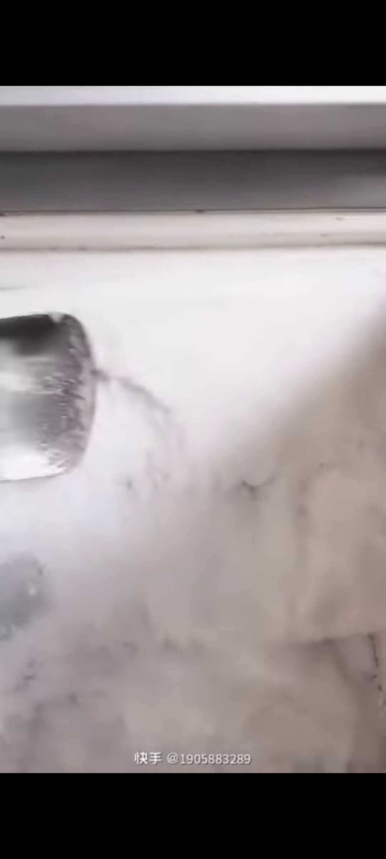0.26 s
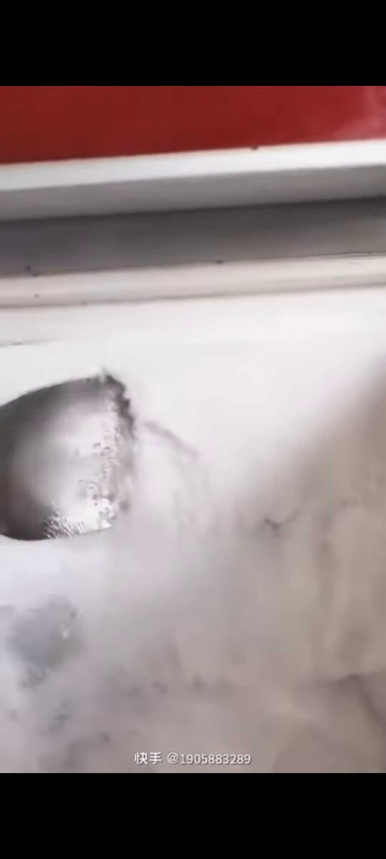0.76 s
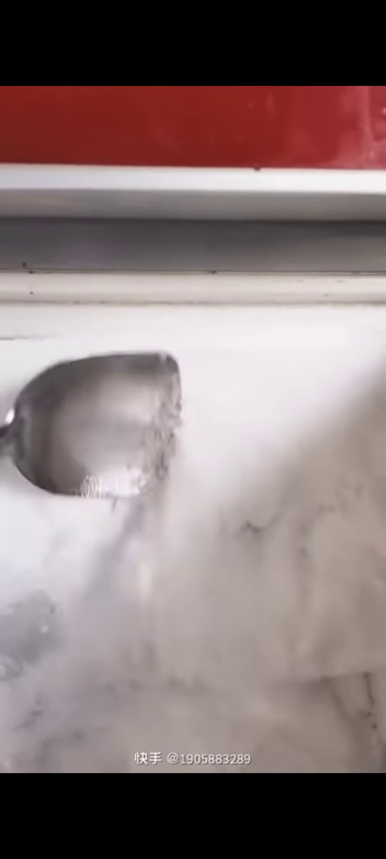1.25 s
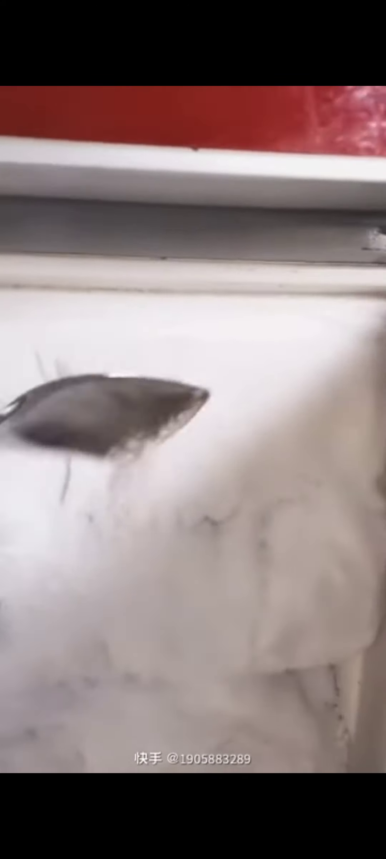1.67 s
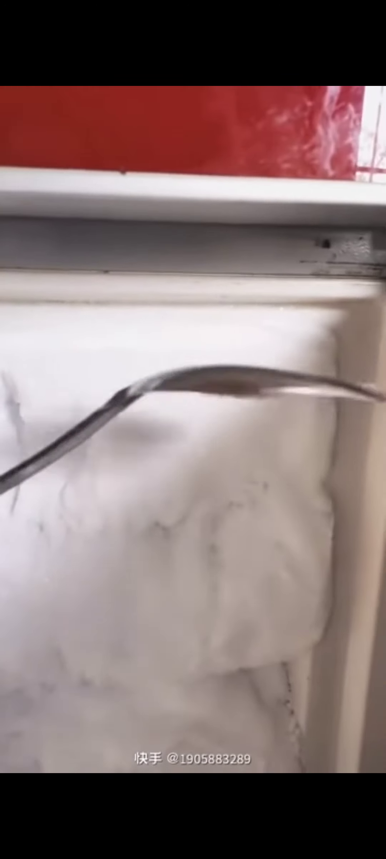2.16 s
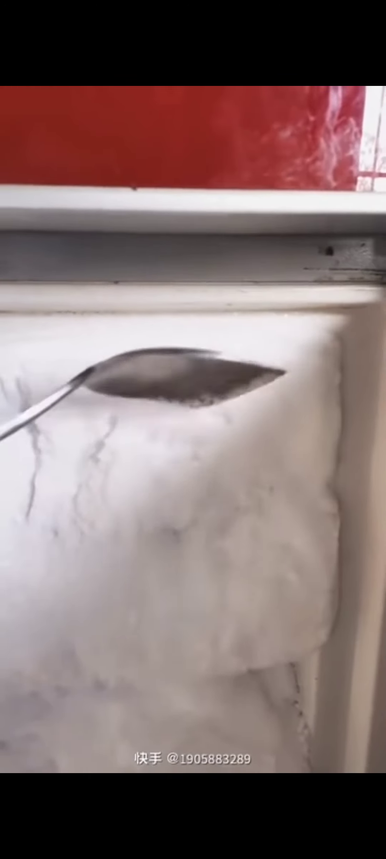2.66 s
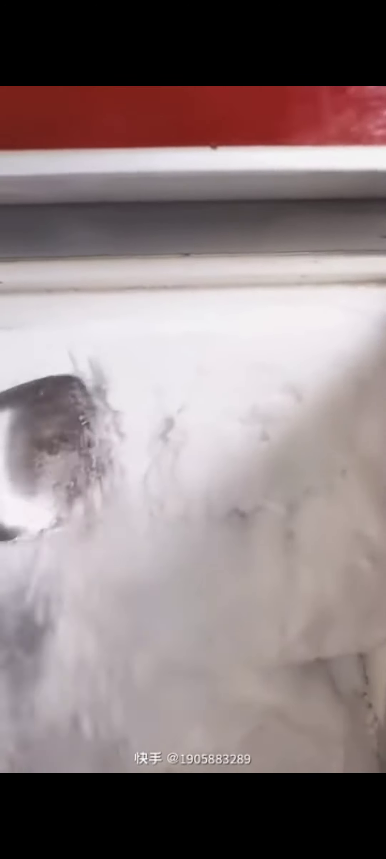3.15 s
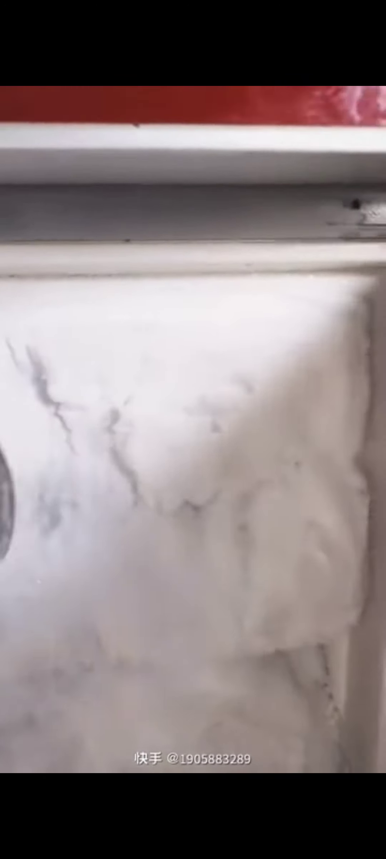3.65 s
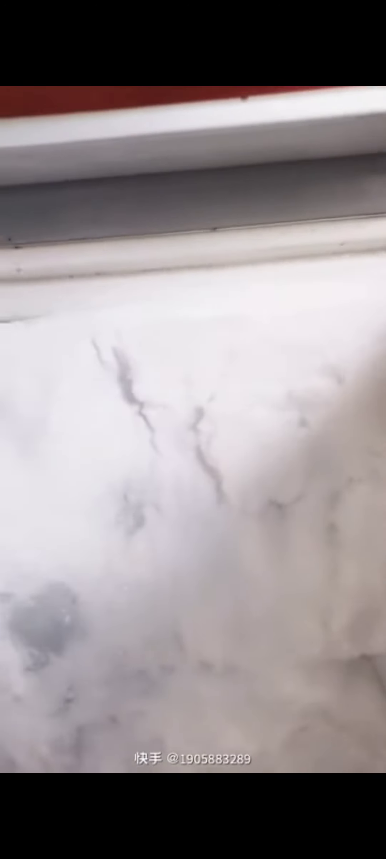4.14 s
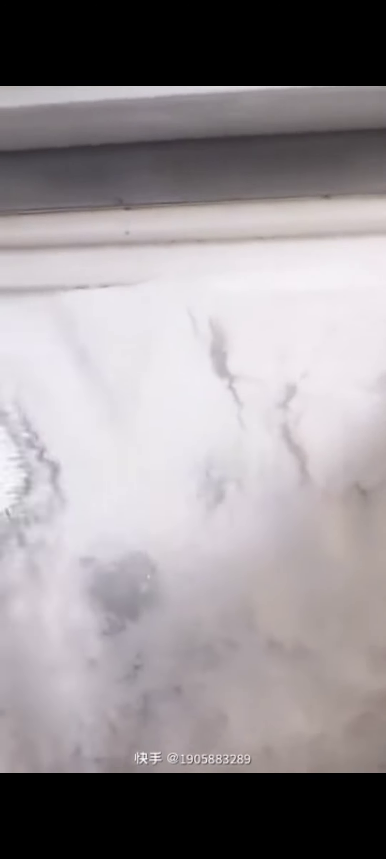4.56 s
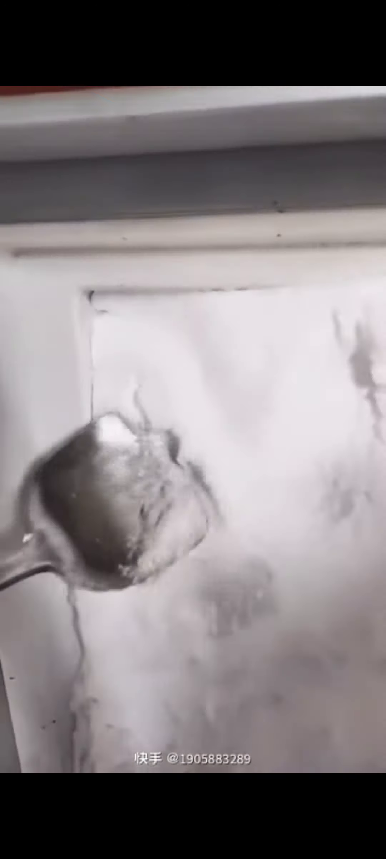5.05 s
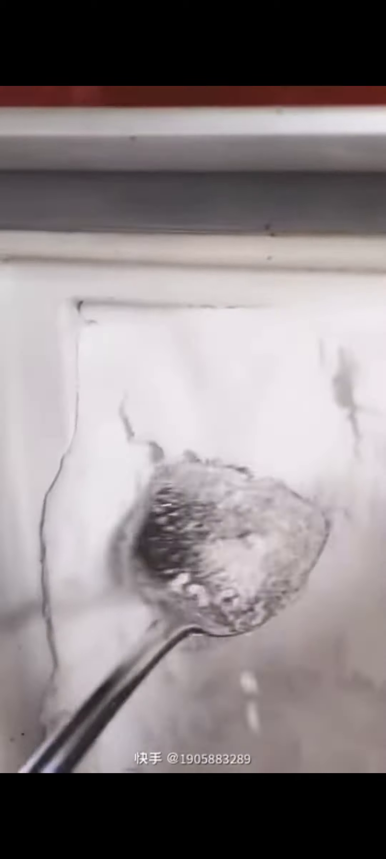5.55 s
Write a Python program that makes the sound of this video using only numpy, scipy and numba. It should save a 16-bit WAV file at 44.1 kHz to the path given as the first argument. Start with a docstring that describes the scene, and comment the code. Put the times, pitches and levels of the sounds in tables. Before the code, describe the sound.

Brittle ice crystals crackle under a metal spoon edge in uneven bursts, each a rough rasp or sharp chop. The spoon clinks and sings briefly while the hollow freezer wall thuds beneath. After a sparser middle, the strokes crowd together loudly, then continue as frequent crisp scrapes with less bass. Recorded close in a small compartment opening onto a quiet kitchen, the loudest blows flattened.

```python
"""A steel spoon scrapes and chops thick frost in an open freezer in a kitchen, close to the microphone.
It starts on the right of the wall, with strokes and jabs; ice crystals snap in stick-slip clusters under
the edge, ring the spoon and drum the hollow plastic liner. At 3.53 s it moves to the left part of the wall,
where the liner gives less bass. The compartment and then the kitchen echo each stroke over faint still air;
the loudest peaks overload the microphone."""
import sys
import numpy as np
from scipy import signal
from scipy.fft import rfft, irfft
from scipy.io import wavfile
from scipy.ndimage import uniform_filter1d
from numba import njit

SR = 44100
rng = np.random.default_rng(int(sys.argv[2]) if len(sys.argv) > 2 else 0)


def transcribe(u):
    """Save the signal u as a 16-bit wav file named by the first command-line argument.

    u: samples, shape (n,) or (channels, n), limited to [-1, 1]; the rate is SR.
    q: integer samples, one column per channel.
    """
    v = np.clip(np.atleast_2d(u).T, -1, 1)
    q = np.round(v * 32767).astype(np.int16)
    wavfile.write(sys.argv[1], SR, q)


N = 256112
TIME = np.arange(N) / SR
# the spoon moves to the left part of the wall (s)
SHIFT_S = 3.53


def scraping():
    """Clusters of snapping crystals crunch, shed flakes, make the pressed spoon sing and drum the liner."""
    pressure, hiss_db, drum_db, sing_db = stroke_controls()
    slips = stick_slip(rate=320, scatter_db=2.5, slip_s=0.0045, drag=0.66)
    # harder and softer lumps pass under the edge
    pressure = pressure * undb(1.9 * wander(55))
    snaps = pressure * slips * crystals(N, rate=14000, spread_db=3.5)
    # the edge bears on ever new lumps, so the pitch of the contact keeps hopping
    lump_hz = contact_pitch(TIME) * np.exp(0.2 * np.clip(wander(70), -2, 2))
    force = contact(snaps, hiss_db, lump_hz, width=0.1, bite_db=7.0)
    flakes = pressure * chips(rate=260, low_hz=758, high_hz=6310, cycles=3.7, scatter_db=1.5)
    # where the ice is hard and smooth the spoon sings and the crunch recedes
    crunch = undb(-7.5) * frost(force) + undb(-11.5) * flakes
    crunch = undb(-0.4 * sing_db) * crunch
    singing = undb(-7 + sing_db) * bowl(snaps)
    drumming = undb(-5) * liner(snaps * undb(drum_db), damping=1.3)
    return crunch + singing + drumming


def stroke_controls():
    """Each stroke digs in, pushes and eases off; where two overlap the firmer one leads, between them it lifts."""
    # scraping strokes; the last three columns are balances of fine-crystal hiss, liner and spoon,
    # before they shift with the pressure and the depth of the edge:
    # start_s, dig_in_s, full_push_s, easing_off_s, full_pressure_db, hiss_db, drumming_db, singing_db
    strokes = [ (0.01, 0.013, 0.1, 0.15, -25.5, -1, -4.5, 5),
               (0.146, 0.017, 0.011, 0.095, -6.5, 2.5, 0.5, 0), (0.31, 0.01, 0.017, .03, -32, 10.5, -2, 1),
               (0.361, 0.077, 0.017, 0.034, -12.5, 5, -4, 3), (0.49, 0.014, .1, 0.032, -30, 9, -6, -1),
               (0.629, 0.027, 0.019, 0.086, -9, 5.5, -8, 0.5), (0.867, 0.02, .012, .03, -12, 10, -10, 2),
               (0.905, 0.0072, 0.024, 0.079, -16, 8.5, -3, 4), (1.04, 0.013, .02, 0.12, -22, -1, -6, -5),
               (1.154, 0.0075, 0.0091, 0.039, -27, 13, 2.5, 5.5),
               (1.266, 0.0045, 0.089, 0.076, -21, -4.5, -11, -4.5), (1.99, .01, .05, 0.35, -31, 1, -7, 2),
               (2.354, 0.0051, 0.03, 0.12, -27, 2.5, -2.5, -2),
               (2.485, 0.0087, .01, 0.13, -34.5, 3, -8, -1),
               (2.596, 0.0056, .03, 0.025, -24.5, 6.5, 0, 2.5),
               (2.627, .045, 0.053, 0.013, -7, 0.5, -11, -0.5),
               (2.735, 0.027, .02, 0.034, -28, 0, -2.5, -3),
               (2.923, 0.022, .015, 0.028, -9.5, 2, -12.5, 6.5),
               (2.963, 0.013, 0.028, 0.076, -4.5, 1.5, -10, 1),
               (3.07, 0.05, 0.06, 0.064, -21.5, 4, -8.5, 4.5), (3.245, 0.011, 0.059, .03, -39, 11, -6, -1),
               (3.559, 0.0087, 0.016, .05, -32, 7, -8, 7.5),
               (3.642, 0.0073, 0.011, 0.084, -5, -0.5, -8.5, 3.5),
               (3.69, 0.014, 0.022, 0.11, -20, 6, -12, 6),
               (3.905, 0.05, 0.0069, 0.057, -5.5, 0.5, -13.5, 3),
               (4.03, 0.015, 0.011, 0.054, -20.5, 9, -7, 3),
               (4.163, 0.038, 0.017, 0.067, -10, 1.5, -8.5, 0.5),
               (4.26, 0.021, 0.034, 0.11, -28, 5.5, -9, 4), (4.446, 0.0071, 0.0084, 0.058, -7, 2, -9.5, 4),
               (4.53, 0.025, 0.0046, 0.059, -16.5, 5, -13, 3),
               (4.668, 0.0061, 0.018, .01, -17.5, 9, -10, 7),
               (4.68, 0.016, 0.1, 0.048, -13.5, 8.5, -6, 5.5), (4.95, 0.014, 0.048, 0.037, -31, 5, 1, 3),
               (5.028, 0.017, 0.02, 0.033, -19, 9, -10, 9), (5.078, 0.013, 0.03, 0.052, -8.5, 3, -7.5, 2),
               (5.185, 0.025, .005, 0.012, -15, 5, -14.5, 2.5), (5.27, .016, 0.034, 0.073, -14.5, 2, 1, 4),
               (5.42, .02, .005, 0.081, -16, 0, -6.5, 3.5), (5.55, .028, 0.0088, 0.036, -10, 3, -2, 3),
               (5.646, 0.023, 0.037, 0.027, -14.5, 8, -13, 7.5), ]
    # pressure at both ends, relative to the full push (dB)
    first_touch_db, last_touch_db = -20, -26.5
    # time for the edge to land and to lift (s)
    land_s, lift_s = 0.0034, 0.0058
    # the liner drums more as the edge sinks through the frost (dB)
    drum_start_db, drum_end_db = -4.5, 6.5
    # a light touch breaks only fine crystals and lets the spoon sing more freely (dB per dB of slack)
    hiss_per_slack, sing_per_slack = 0.1, 0.21
    controls = np.zeros((4, N))
    for start, dig_s, push_s, ease_s, db, hiss_db, drum_db, sing_db in strokes:
        corners = start + np.cumsum([0, dig_s, push_s, ease_s])
        end = corners[-1]
        contact_s = [start - land_s, start, end, end + lift_s]
        span = slice(*np.searchsorted(TIME, [contact_s[0], contact_s[-1]]))
        t = TIME[span]
        slack_db = -np.interp(t, corners, [first_touch_db, 0, 0, last_touch_db])
        touching = np.interp(t, contact_s, [0, 1, 1, 0])
        pressure = touching * undb(db - slack_db)
        sunk_db = np.interp(t, [start, end], [drum_start_db, drum_end_db])
        stroke = [
            pressure,
            hiss_db + hiss_per_slack * slack_db,
            drum_db + sunk_db,
            sing_db + sing_per_slack * slack_db,
        ]
        firmer = pressure > controls[0, span]
        controls[:, span] = np.where(firmer, stroke, controls[:, span])
    return controls


def stick_slip(rate, scatter_db, slip_s, drag):
    """The edge catches and lets go at uneven moments (rate per second), over a steady drag; rms near 1."""
    chance = rng.random((N, 2))
    slips = (chance[:, 0] < rate / SR) * undb(scatter_db * chance[:, 1])
    gate = through(slips, np.exp(-TIME[:SR // 10] / slip_s))
    gate = gate / gate.mean() + drag
    # the hand keeps the mean force even
    return gate / np.sqrt(uniform_filter1d(gate ** 2, size=1400))


def crystals(size, rate, spread_db):
    """Snaps of single ice crystals (rate per second): many small, a few large; rms 1."""
    strength = undb(spread_db * np.minimum(rng.exponential(size=size), 4))
    happens = rng.random(size) < rate / SR
    snaps = happens * rng.choice([-1, 1], size) * strength
    return snaps / np.sqrt(np.mean(snaps ** 2))


def contact_pitch(t):
    """Resonance of the edge against the ice at these times, in Hz, as the spoon works over the wall."""
    # path of the contact resonance: time_s, pitch_hz
    path = [(0, 1454), (0.42, 1240), (0.88, 1900), (1.05, 1500), (1.45, 1400), (1.98, 890), (2.36, 1970),
            (2.68, 1410), (2.94, 1500), (3.0, 2060), (3.95, 1770), (4.45, 2100), (4.78, 2420), (5.06, 2550),
            (5.25, 2080), (5.8, 2130)]
    return np.interp(t, *np.transpose(path))


def contact(snaps, hiss_db, hz, width, bite_db, split_hz=4500):
    """The edge resonates against the ice; finer crystals add treble."""
    coarse = signal.sosfilt(signal.butter(2, split_hz, fs=SR, output="sos"), snaps)
    fine = signal.sosfilt(signal.butter(2, split_hz, "high", fs=SR, output="sos"), snaps)
    return coarse - fine * undb(hiss_db) + undb(bite_db) * resonance(coarse, hz, width)


def chips(rate, low_hz, high_hz, cycles, scatter_db):
    """Flakes of ice break off at random moments (rate per second), each with its own short pitch; rms 1."""
    t = TIME[:SR // 50]
    # at most one flake per slot; columns: whether it breaks, pitch, level, moment
    slots = rng.random((N // 64, 4))
    out = np.zeros(N + len(t))
    for k in np.flatnonzero(slots[:, 0] < rate * N / SR / len(slots)):
        hz = low_hz * (high_hz / low_hz) ** slots[k, 1]
        start = int((k + slots[k, 3]) * N / len(slots))
        flake = unit(np.sin(2 * np.pi * hz * t) * np.exp(-t * hz / cycles))
        out[start:start + len(t)] += undb(scatter_db * slots[k, 2]) * flake
    return out[:N] / np.std(out)


def frost(force):
    """Broad crunch of the frost layer, coloured by the part of the wall."""
    # relative spectrum of the crunch: pitch_hz, right_db, left_db
    crunch = [(100, -13, -14), (387, -4.5, -1.5), (644, -1.5, -5.5), (930, 2.5, -5), (1460, 2, 1.5),
              (2870, 0.5, 0.5), (3900, -3.5, -4), (4640, 0, -6.5), (5760, -2.5, -6), (8400, -5.5, -6.5),
              (10300, -11, -13), (11500, -13, -15.5), (13800, -6.5, -12), (15900, -7, -13.5)]
    right, left = (unit(colour(np.array(crunch)[:, [0, side]])) for side in (1, 2))
    return along_wall(force, right, left)


def bowl(force, drift=0.013, patchy_db=3.5):
    """The contact travels along the rim, so each resonance of the ice-damped bowl swells and bends on its own."""
    # resonances of the pressed bowl, before they drift: pitch_hz, width_hz, right_db, left_db
    resonances = [(1487, 65, -13.5, -38.5), (1970, 20, -25, -13), (2280, 160, -5.5, -36),
                  (2755, 52, -6, -17), (3982, 74, -5.5, -0.5), (5362, 56, 3, -3), (5640, 140, 4, -3),
                  (7180, 250, -3.5, 0), (7880, 120, -4.5, -24)]
    out = 0
    for hz, width, right_db, left_db in resonances:
        db = np.where(TIME > SHIFT_S, left_db, right_db) + patchy_db * np.minimum(wander(35), 1)
        bent_hz = hz * (1 + drift * wander(25))
        # narrow and wide resonances get comparable loudness
        even = np.sqrt(SR / np.pi / width)
        out = out + undb(db) * resonance(force, bent_hz, width / hz) * even
    return out / np.sqrt(len(resonances))


def liner(force, damping, right_hz=45, left_hz=105):
    """The hollow plastic wall under the frost; it is stiffer near the left corner and gives less bass there."""
    # modes of the liner, t60 before the extra damping: pitch_hz, right_db, left_db, t60_s
    wall = [(99.6, -9.5, -24, 0.6), (170.6, -2, -14, 0.29), (196.3, -3, -9.5, 0.14), (230.5, -18, 5, 0.075),
            (280.2, -0.5, 3.5, 0.16), (314.5, -5, -7.5, 0.18), (405.7, -13, -6.5, 0.11),
            (481, -4, -7.5, 0.074), (626.4, -10.5, -12, 0.11), (702, -11.5, -15, 0.53)]
    sides = []
    for side, lowest_hz in ((1, right_hz), (2, left_hz)):
        modes = ring(np.array(wall)[:, [0, side, -1]], damping)
        sides.append(signal.sosfilt(signal.butter(2, lowest_hz, "high", fs=SR, output="sos"), modes))
    return along_wall(force, *sides)


def along_wall(force, right, left):
    """The response changes when the spoon moves to the left part of the wall."""
    moved = TIME > SHIFT_S
    return through(force * ~moved, right) + through(force * moved, left)


def jabbing(crush_s=0.0037, lead_in_s=0.011, lead_in_db=-13, push_s=0.00064, sink_s=0.00541, wall_growth=1.49):
    """Each jab swells in softly, crushes the frost and shoves the liner; the spoon rings on."""
    # jabs of the edge; hiss, thud and ring are relative to the level of the jab:
    # start_s, level_db, hiss_db, thud_db, thud_pitch_hz, spoon_ring_db
    jabs = [ (0.237, -7.5, -1, -30, 275, -16), (0.42, 2, -21, -20, 187, -15),
            (0.551, -13.5, 6, -8.5, 390, 4), (0.869, -6.5, -4, -28, 196, 11), (0.909, -8, -8, -26, 169, -8),
            (1.034, -1.5, -12, -14.5, 397, -13), (1.223, -16, 2.5, -8, 310, -2),
            (1.272, -16, 2, -3, 356, -11), (1.366, -18, -6, -24, 350, -6),
            (1.451, -4, -2.5, -2.5, 205, 17.5), (1.724, -4, -0.5, -2.5, 235, -34),
            (1.983, 0, -4.5, -5, 243, -15), (2.101, -26, -3, 4.5, 297, -9), (2.122, -20.5, 4, -7, 290, -6),
            (2.22, -2.5, -4.5, -4.5, 222, -19), (2.357, -19.5, -22, -9.5, 400, -4),
            (2.718, -11, -14, -33, 309, -9), (2.9, -15, 0, -15, 168, 1), (2.937, -3, -24, -19.5, 168, -6),
            (3.041, 3, -4.5, -37, 260, -2), (3.25, -24, -7, -30, 347, 0), (3.322, 1.5, -1.5, -22.5, 312, 2),
            (3.364, 3.5, -6, -13.5, 307, -18), (3.649, -10, 9, -12, 168, 10),
            (4.113, -17, 5, -8.5, 434, -2), (4.166, -9.5, 8.5, -23, 384, -6),
            (4.253, -20.5, 6, -12, 234, -9), (4.398, -24, 0.5, -10.5, 405, -1),
            (4.464, -5, 2.5, -21, 213, -4), (4.918, -36, 16.5, -10, 294.8, 0),
            (4.942, -12.5, -1, -3.5, 387, -5), (5.006, -23.5, 1.5, -20, 280, 2),
            (5.028, -24.5, 3, -16, 250, 24.5), (5.323, -3.5, 2, -14, 227, -10),
            (5.438, -8, 0, -37, 420, 9.5), (5.539, -9, -11, -12, 206, -3), ]
    # the spoon ringing free: pitch_hz, level_db, t60_s
    spoon = [(1560, -19, 0.38), (2500, -17, 0.24), (2674, 7.5, 0.072), (3260, -21, 0.13), (3840, -14, 0.15),
             (3950, 13.5, 0.091), (5230, 12, 0.034), (5430, -10, 0.098), (5930, -9, 0.13),
             (7290, -19, 0.14)]
    before = SR // 20
    t = TIME[:SR // 6] - before / SR
    age = np.maximum(t, 0) / crush_s
    crushing = np.sqrt(2 * np.e * age) * np.exp(-age)
    lead_in = undb(lead_in_db) * np.exp(-np.abs(t) / (lead_in_s / 2))
    shape = crushing + lead_in
    # the liner is pushed only once the edge has sunk in
    push = unit(np.sin(np.pi * np.clip((t - sink_s) / push_s, 0, 1)) ** 2)
    crush, clink, shove, patch = np.zeros((4, N + len(t)))
    for s, db, hiss_db, thud_db, thud_hz, ring_db in jabs:
        start = int(s * SR) - before
        span = slice(start, start + len(t))
        snaps = undb(db) * shape * crystals(len(t), rate=16000, spread_db=3)
        crush[span] += contact(snaps, hiss_db, contact_pitch(s + t), width=0.23, bite_db=0.5)
        clink[start + before] += undb(db + ring_db)
        # a light blow knocks only the patch under the edge; a heavy one sets the whole wall going
        knock = undb(db + thud_db)
        knock_hz = np.full(len(t), float(thud_hz))
        patch[span] += knock * unit(resonance(push, knock_hz, 0.14))
        shove[span] += knock ** wall_growth * resonance(push, knock_hz, 0.68)
    crunch = undb(-5.5) * frost(crush[:N]) + undb(-17.0) * bowl(crush[:N])
    ringing = undb(5.0) * through(clink[:N], ring(spoon, damping=1))
    thud = undb(20.5) * liner(shove[:N], damping=1.37) + undb(24.5) * patch[:N]
    return crunch + ringing + thud


def ring(modes, damping):
    """Impulse response of a set of decaying modes, each (Hz, dB, t60 s)."""
    t = TIME[:SR // 2]
    out = 0
    for hz, db, t60 in modes:
        out = out + undb(db) * unit(np.sin(2 * np.pi * hz * t) * fade(t60 / damping))
    return unit(out)


@njit
def resonance(x, hz, width):
    """Band-pass with a moving centre; the width is a share of the centre."""
    y, band, low = np.empty(len(x)), 0., 0.
    for i in range(len(x)):
        g = np.tan(np.pi * hz[i] / SR)
        # the tiny offset keeps the silent filter out of very slow arithmetic
        v = (band + g * (x[i] + 1e-18 - low)) / (1 + g * (g + width))
        band, low, y[i] = 2 * v - band, low + 2 * g * v, width * v
    return y


def wander(rate):
    """A smooth random drift with a spread near 1, taking about this many new values a second."""
    hold = int(SR / rate)
    steps = np.repeat(rng.standard_normal(N // hold + 1), hold)
    return 1.14 * uniform_filter1d(steps, hold)[:N]


def echoes(x, spectrum, t60, delay_s, count=3):
    """Diffuse tails that start after the first wall; as the spoon moves, other paths take over."""
    paths = np.array([wander(4) for _ in range(count)])
    paths /= np.linalg.norm(paths, axis=0)
    decay = fade(t60) * (TIME[:SR // 2] > delay_s)
    wet = 0
    for share in paths:
        tail = unit(rng.standard_normal(len(decay)) * decay)
        wet = wet + through(x * share, tail)
    return through(wet, colour(spectrum))


def kitchen_air():
    """Still air of the kitchen: faint steady noise, strongest in the low mids."""
    # relative spectrum of the air: pitch_hz, level_db
    spectrum = [(25, 0), (70, -4), (170, 7), (300, 6), (600, -2.5), (2000, -8), (6000, -13), (10000, -21),
                (15500, -14)]
    return undb(-42.5) * through(rng.standard_normal(N), unit(colour(spectrum)))


def undb(db):
    """Decibels to gain."""
    return 10 ** (np.asarray(db) / 20)


def unit(x):
    """Scale a response to unit energy."""
    return x / np.sqrt(np.sum(x ** 2))


def through(x, response):
    """Pass a sound through an impulse response."""
    return signal.oaconvolve(x, response)[:len(x)]


def fade(t60):
    """Half a second of exponential decay, falling 60 dB in t60 seconds."""
    return np.exp(-np.log(1000) * TIME[:SR // 2] / t60)


def colour(points, size=2048):
    """Causal (minimum-phase) response with a given (Hz, dB) spectrum."""
    hz, db = np.transpose(points)
    bins = np.maximum(np.fft.rfftfreq(size, 1 / SR), 1)
    gain = undb(np.interp(np.log(bins), np.log(hz), db))
    # folding the cepstrum puts all the energy after the impulse
    cepstrum = irfft(np.log(gain))
    cepstrum[1:size // 2] *= 2
    cepstrum[size // 2 + 1:] = 0
    return irfft(np.exp(rfft(cepstrum)))


def scene():
    """Spoon and frost in the small compartment, which opens on a quiet kitchen."""
    # echo spectrum of the compartment: pitch_hz, level_db
    box = [(100, -17), (400, 0.5), (1200, -3), (2500, -10.5), (5000, -13.5), (15000, -8)]
    # echo spectrum of the kitchen: pitch_hz, level_db
    kitchen = [(100, -19), (300, -11), (1200, -17), (5000, -14.5), (10000, -14), (15000, -14.5)]
    direct = scraping() + jabbing()
    boxed = direct + echoes(direct, box, t60=0.21, delay_s=0.003)
    room = echoes(boxed, kitchen, t60=0.43, delay_s=0.011)
    return (boxed + room + kitchen_air())[None]


def record(dry, bass_hz=60, top_hz=15750, ceiling=0.71):
    """The microphone thins the deep bass and flattens the loudest peaks; the top is cut."""
    thin = signal.sosfilt(signal.butter(2, bass_hz, "high", fs=SR, output="sos"), dry)
    clipped = thin / (1 + (thin / ceiling) ** 8) ** (1 / 8)
    return signal.sosfiltfilt(signal.ellip(10, 0.1, 60, top_hz, fs=SR, output="sos"), clipped)


dry = scene()
out = record(dry)
transcribe(out)
```